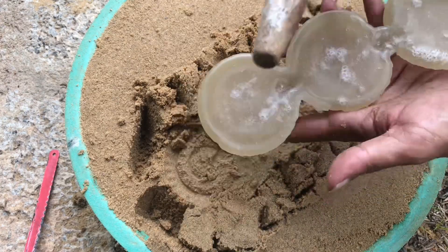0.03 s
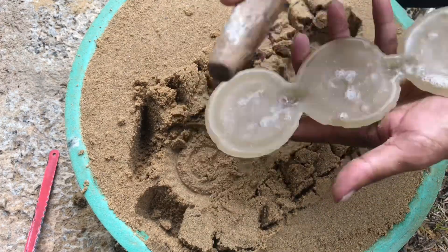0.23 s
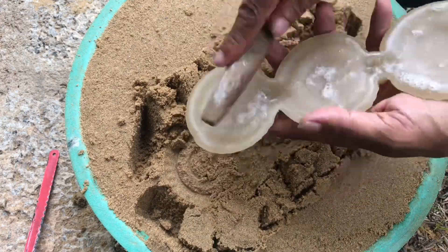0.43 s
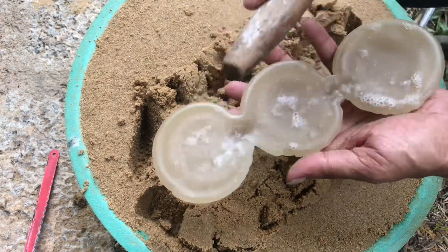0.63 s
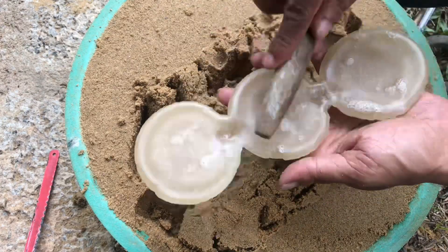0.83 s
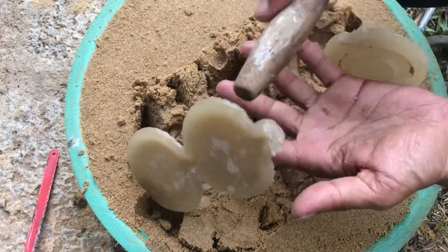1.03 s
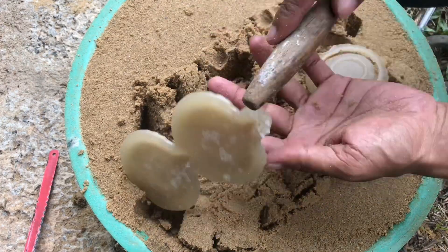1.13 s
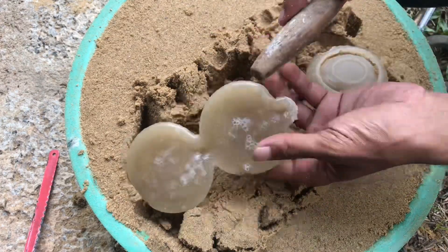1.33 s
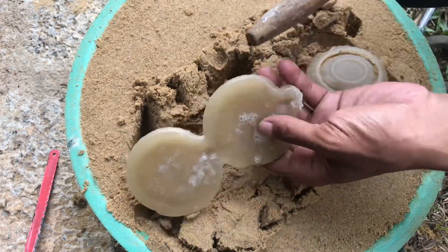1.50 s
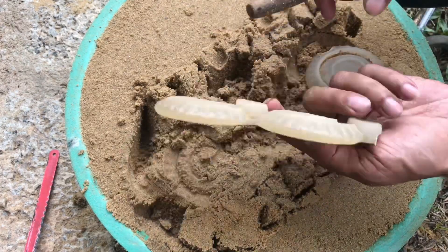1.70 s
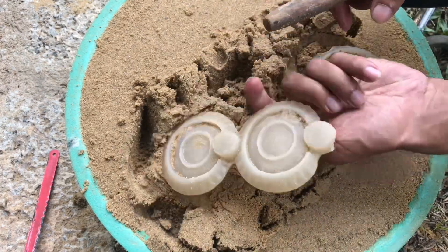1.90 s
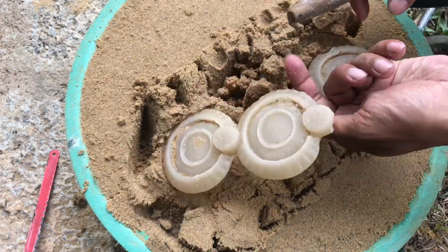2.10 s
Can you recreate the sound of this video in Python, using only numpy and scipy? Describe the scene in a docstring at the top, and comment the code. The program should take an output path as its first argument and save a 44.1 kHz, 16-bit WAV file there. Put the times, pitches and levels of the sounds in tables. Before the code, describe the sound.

A wooden stick taps wax discs in six short, sharp knocks, cracking one off.

```python
"""A faint echo dies away, then a wooden stick taps a chain of three wax discs held over a tub of sand.
The hand stops each knock from ringing within milliseconds, and a short echo follows.
The fourth tap cracks a disc off, so the last two taps ring differently on the shorter piece.
Fingers then turn the sandy wax over, with small scuffs, soft bumps and a faint squeak.
A quiet rumble and a thin hiss lie underneath from start to end."""
import sys
import numpy as np
from scipy import signal
from scipy.fft import rfft, irfft
from scipy.io import wavfile

SR = 44100
rng = np.random.default_rng(int(sys.argv[2]) if len(sys.argv) > 2 else 0)


def unload_wav(signal):
    """Save mono or channel-first audio to the path in sys.argv[1] as 16-bit WAV at rate SR, clipped to [-1, 1]."""
    wavfile.write(
        sys.argv[1],
        SR,
        np.round(np.clip(np.atleast_2d(signal).T, -1, 1) * 32767).astype(np.int16),
    )


N = 94815

BREAK_S, BASS_CUT_HZ = .8, 240  # two discs are left after BREAK_S; small discs give out little bass
CRACK_DB, CRACK_S, CRACK_HZ = -16.5, .0009, 6480
BOOST_DB, DIP_DB, SPOT_OCTAVES = 5.5, -12.5, .08  # the spot struck favours one pitch and misses another
# The notes of the wax before and after the break; each tap retunes them a little.
# f/Hz, level/dB, t60/s (the time to fade by 60 dB)
THREE_DISC_NOTES = [(278.3, -17, 0.0053), (667, -15.5, 0.0096), (1109, 0, 0.012), (1416, -0.5, 0.015),
                    (1935, 0, 0.0057), (2407, -2, .012), (2933, 0, 0.014), (3397, -3, 0.011),
                    (3790, -2.5, 0.015), (4490, -5.5, 0.017), (5465, -3, .013), (6210, -8, 0.025),
                    (7104, -6.5, 0.0055), (9700, -13, .009)]
TWO_DISC_NOTES = [(248, -25, 0.0065), (790, -11, 0.004), (1250, 1.5, 0.0071), (1580, 1, 0.0092),
                  (2560, -0.5, 0.0065), (3310, -8, 0.042), (3690, -6.5, 0.015), (4570, -9, 0.0043),
                  (5770, -2, 0.0052), (6470, -11, 0.004), (7180, -11, 0.021), (9330, -11.5, 0.0034)]
# Centres of five tone ranges (thud, body, middle, edge, crack): f/Hz
TONE_RANGES = (350, 1300, 2600, 5000, 12000)
# Taps of the stick: t/s, level/dB, tuning factor, thud/dB, body/dB, edge/dB, crack/dB,
# boosted f/Hz, dipped f/Hz, bounce delay/ms, bounce level against the tap/dB
TAPS = [(0.2337, -15.5, .99, 5, -3, 3, 1, 2170, 1480, 0.9, -14),
        (0.3585, -15, 0.96, -3.5, -1.5, 1, -0.5, 4180, 686, 2, -23),
        (0.4903, -16, 0.97, -1.5, -2, -5, -3.5, 1914, 2650, 1.5, -18),
        (0.7675, -23, 0.91, 11.5, 1.5, -3, 9, 1173, 4450, 6.67, -8.5),
        (0.8829, -18.5, 0.99, 9.5, -1.5, 1.5, -7.5, 2660, 2030, 0.94, -18),
        (1.0122, -18.5, .99, 10, -0.5, 1.5, -6.5, 1360, 1930, 9.0, -14.5)]
def taps(size=4096):
    """Each tap briefly rings the wax; the spot struck shapes the tone, and the stick bounces once."""
    out, t = np.zeros(N), np.arange(size) / SR
    treble_only = signal.butter(2, CRACK_HZ, "high", fs=SR)
    bass_cut = signal.butter(2, BASS_CUT_HZ, "high", fs=SR)
    for at, db, tuning, thud, body, edge, crack, boost_hz, dip_hz, bounce_ms, bounce_db in TAPS:
        notes = THREE_DISC_NOTES if at < BREAK_S else TWO_DISC_NOTES
        ring = np.zeros(size)
        for k, (hz, note_db, t60) in enumerate(notes):
            note = unit(np.sin(2 * np.pi * hz * tuning * t) * fade(t, t60))
            ring += (-1) ** k * gain(note_db) * note  # every other note starts by swinging down
        burst = rng.standard_normal(size) * np.exp(-t / CRACK_S)
        grit = signal.lfilter(*treble_only, burst)
        tone = curve(list(zip(TONE_RANGES, (thud, body, 0, edge, crack))), size)
        tone += BOOST_DB * bell(boost_hz, SPOT_OCTAVES, size)
        tone += DIP_DB * bell(dip_hz, SPOT_OCTAVES, size)
        knock = shape(unit(ring) + gain(CRACK_DB) * unit(grit), tone)
        knock = signal.lfilter(*bass_cut, knock)
        add(out, at, knock, db)
        add(out, at + bounce_ms / 1000, knock, db + bounce_db)
    return out


# The tone of a snap: f/Hz, level/dB
SNAP_TONE = [(300, -29), (1200, 3), (3000, 5), (6000, -0.5), (9000, -10.5), (15000, -40)]
# Tiny snaps in the wax: t/s, level/dB, treble tilt/dB per octave
SNAPS = [(0.7676, -43, 1), (1.006, -30, -1), (1.2305, -57, -3.5)]
def wax_snaps(size=2048, t60=.022):
    """The wax splinters in tiny, bright bursts of noise."""
    out, t = np.zeros(N), np.arange(size) / SR
    treble = np.maximum(octaves(size), np.log2(TONE_RANGES[1]))  # flat below the body range
    for at, db, tilt in SNAPS:
        burst = rng.standard_normal(size) * fade(t, t60)
        add(out, at, shape(burst, curve(SNAP_TONE, size) + tilt * treble), db)
    return out


# Notes that linger after two of the taps: t/s, f/Hz, level/dB, t60/s
STICK_NOTES = [(.236, 2150, -44, .15), (.491, 1980, -50, .14)]
def stick_ring():
    """A faint note, probably from the wooden stick, outlasts the knock."""
    out = np.zeros(N)
    for at, hz, db, t60 in STICK_NOTES:
        age = np.maximum(np.arange(N) / SR - at, 0)
        out += gain(db) * np.sin(2 * np.pi * hz * age) * fade(age, t60)
    return out


ECHO_DELAY_S = .002
def near_echo(knocks, db=-16, t60=.045):
    """The tub and the hand quickly scatter each knock back."""
    t = np.arange(SR // 8) / SR
    onset = np.clip(t / ECHO_DELAY_S - 1, 0, 1)
    scatter = rng.standard_normal(len(t)) * onset * fade(t, t60)
    return gain(db) * signal.fftconvolve(knocks, scatter / np.linalg.norm(scatter))[:N]


# The tone of the surroundings: f/Hz, level/dB
ECHO_TONE = [(200, -14), (450, -12), (1200, 1), (2200, -0.5), (3600, -3.5), (6000, -10), (9000, -19),
             (15000, -26.5)]
# A quick and a slow echo: level against the tap/dB, t60/s
ECHO_TAILS = [(-15, .065), (-24, .32)]
def far_echo(size=16384, tap_tone_share=.6):
    """The surroundings return each tap as a smooth, fading noise that keeps some of its tone."""
    out, t = np.zeros(N), np.arange(size) / SR
    for at, db, _, thud, body, edge, crack, *_ in TAPS:
        tap_tone = curve(list(zip(TONE_RANGES, (thud, body, 0, edge, crack))), size)
        tone = curve(ECHO_TONE, size) + tap_tone_share * tap_tone
        for tail_db, t60 in ECHO_TAILS:
            tail = shape(rng.standard_normal(size), tone) * fade(t, t60)
            add(out, at + ECHO_DELAY_S, tail, db + tail_db)
    return out


# The tone of a scuff: f/Hz, level/dB
SCUFF_TONE = [(200, 10), (900, -8), (2000, 6), (5000, 3.5), (9000, 2.5), (14000, 7.5)]
# Finger scuffs: t/s, half length/s, level/dB, tilt/dB per octave
SCUFFS = [(0.084, 0.0074, -56.5, -3), (0.654, 0.0029, -63, 3), (0.947, 0.0059, -57.5, 7.5),
          (1.113, 0.0037, -52.5, 1.5), (1.182, 0.012, -55, 0), (1.267, 0.034, -71, -0.5),
          (1.327, 0.0083, -56.5, 2), (1.692, 0.0051, -61.5, -0.5), (1.808, .008, -70, -2.5),
          (1.905, 0.0035, -64.5, -0.5), (1.97, 0.0035, -54, -0.5), (1.99, 0.018, -69, 0)]
def finger_scuffs(grain_db=2):
    """Fingers rub the sandy wax; the level jumps every 32 samples, which sounds grainy."""
    out = np.zeros(N)
    for at, half, db, tilt in SCUFFS:
        noise = rng.standard_normal(N)
        jumps = np.repeat(rng.standard_normal(N // 32 + 1), 32)[:N]
        grains = noise * gain(grain_db * jumps)
        tone = curve(SCUFF_TONE, N) + tilt * octaves(N)
        out += gain(db) * swell(at, half) * unit(irfft(rfft(grains) * gain(tone), N))
    return out


# Soft bumps: t/s, half length/s, level/dB, f/Hz
BUMPS = [(0.145, 0.018, -63.5, 246), (.65, 0.012, -59.5, 68), (1.188, 0.013, -54.5, 190),
         (1.191, 0.014, -63.5, 810), (1.31, 0.0091, -57, 44.9), (1.687, 0.0092, -56, 159.1),
         (1.904, 0.0067, -59, 230)]
def hand_bumps():
    """Hand and wax meet in short swells of low noise."""
    return sum(gain(db) * swell(at, half) * noise_band(hz, width=.5) for at, half, db, hz in BUMPS)


# Parts of the squeak: t/s, half length/s, level/dB, f/Hz
SQUEAKS = [(1.605, 0.011, -70.5, 2530), (1.628, .015, -69, 1870), (1.685, 0.019, -75, 1690),
           (1.70, .045, -75, 2300)]
def wax_squeak():
    """The wax squeaks as it is turned: narrow bands of noise make a wavering pitch."""
    return sum(gain(db) * swell(at, half) * noise_band(hz, width=.14) for at, half, db, hz in SQUEAKS)


# The tone of the opening echo: f/Hz, level/dB
OPENING_TONE = [(300, -16), (1200, 9.5), (2000, 4.5), (3600, 8), (7000, -10), (15000, -34)]
def opening_echo(db=-51.5, t60=.24):
    """The faint echo of a knock is already dying away as the scene begins."""
    noise = unit(shape(rng.standard_normal(N), curve(OPENING_TONE, N)))
    return gain(db) * noise * fade(np.arange(N) / SR, t60)


# The tone of the rumble: f/Hz, relative level/dB
RUMBLE_TONE = [(15, -34), (25, -6.5), (114, -8.5), (170, -5), (263, -9), (301, -16.5), (416, -18.5),
               (489, -25.5), (734, -24.5), (796, -26.5), (2280, -29), (5000, -37), (6380, -35.5),
               (9840, -39.5), (16000, -36.5)]
# Narrow bands of hiss: f/Hz, width/octaves, level/dB
HISS_BANDS = [(6640, 0.059, -84.5), (9870, .05, -81.5)]
def background(rumble_db=-61):
    """A low, steady rumble with a thin hiss on top."""
    rumble = gain(rumble_db) * unit(shape(rng.standard_normal(N), curve(RUMBLE_TONE, N)))
    return rumble + sum(gain(db) * noise_band(hz, width) for hz, width, db in HISS_BANDS)


def gain(db):
    """Turn decibels into a number to multiply by."""
    return 10 ** (np.asarray(db) / 20)


def unit(x):
    """Scale a sound to an average (rms) level of 1."""
    return x / np.sqrt(np.mean(x ** 2) + 1e-30)


def octaves(size):
    """Each frequency in a sound of this size, in octaves above 1 Hz."""
    return np.log2(np.maximum(np.arange(size // 2 + 1) * SR / size, 1))


def curve(points, size):
    """Join (f/Hz, level/dB) points to get a level for every frequency."""
    hz, db = np.array(points, float).T
    return np.interp(octaves(size), np.log2(hz), db)


def bell(hz, width, size):
    """A smooth hump around one frequency, its width in octaves."""
    return np.exp(-((octaves(size) - np.log2(hz)) / width) ** 2 / 2)


def shape(x, db):
    """Turn each frequency up or down without smearing the sound back in time."""
    size = len(x)
    cepstrum = irfft(np.log(gain(db)), size)
    cepstrum[1:size // 2] *= 2  # fold the filter's late half onto its early half
    cepstrum[size // 2 + 1:] = 0
    return irfft(rfft(x) * np.exp(rfft(cepstrum)), size)


def noise_band(hz, width):
    """Noise around one frequency, its width in octaves."""
    return unit(irfft(rfft(rng.standard_normal(N)) * bell(hz, width, N), N))


def fade(t, t60):
    """Die away by 60 dB every t60 seconds."""
    return np.exp(-np.log(1000) * t / t60)


def swell(at, half):
    """A smooth rise and fall around a moment."""
    return np.exp(-((np.arange(N) / SR - at) / half) ** 2 / 2)


def add(out, at, x, db):
    """Mix in a short sound; db is the level it would have if squeezed into 2 ms."""
    start = int(round(at * SR))
    x = x * gain(db) * np.sqrt(.002 * SR / np.sum(x ** 2))
    out[start:start + len(x)] += x[:N - start]


def scene():
    """Mix knocks, echoes, handling and background into one channel."""
    knocks = taps() + wax_snaps()
    echoes = near_echo(knocks) + opening_echo() + far_echo()
    handling = finger_scuffs() + hand_bumps() + wax_squeak()
    return (knocks + stick_ring() + echoes + handling + background())[None]


def record(dry, top_hz=15800):
    """Cut away the very highest treble."""
    return signal.sosfilt(signal.ellip(10, .2, 70, top_hz, fs=SR, output="sos"), dry)


dry = scene()
out = record(dry)
unload_wav(out)
```